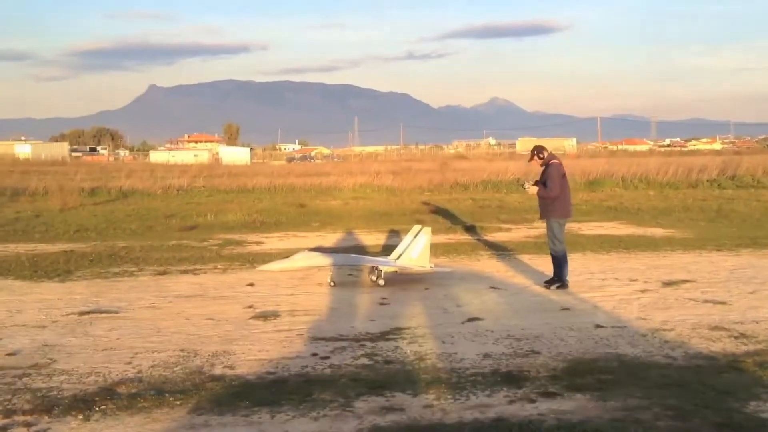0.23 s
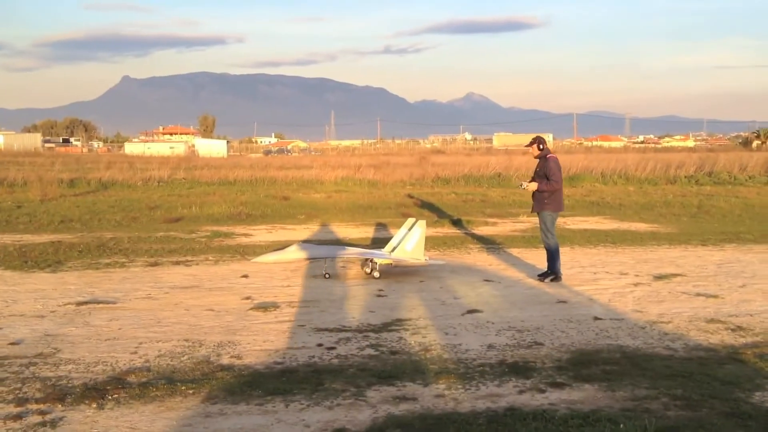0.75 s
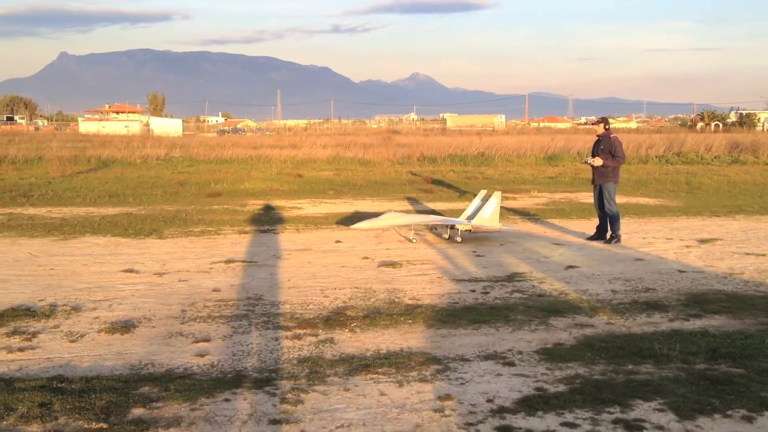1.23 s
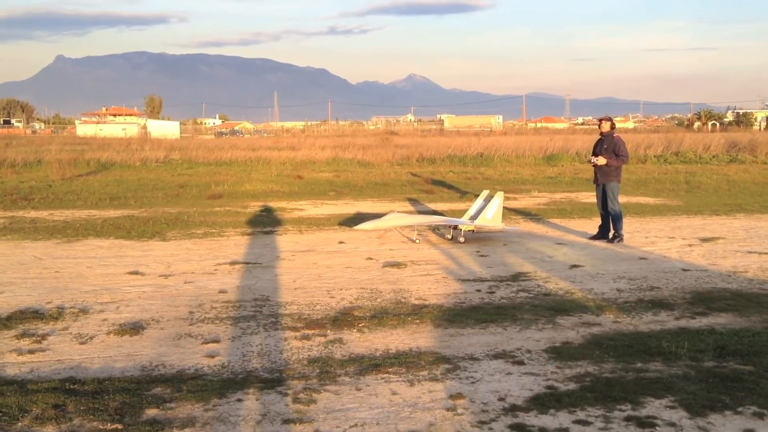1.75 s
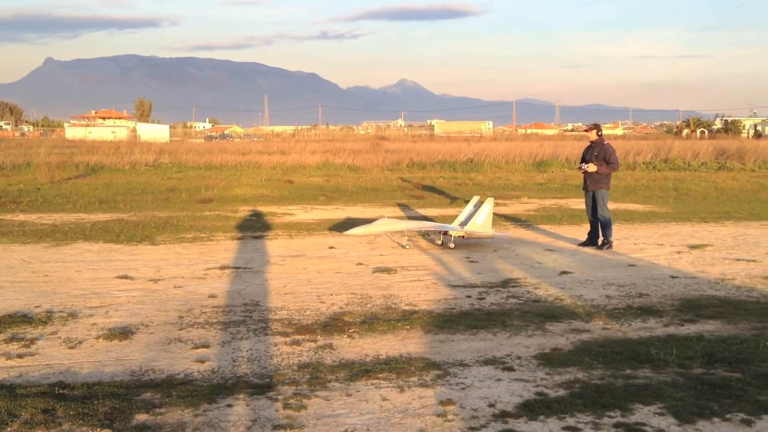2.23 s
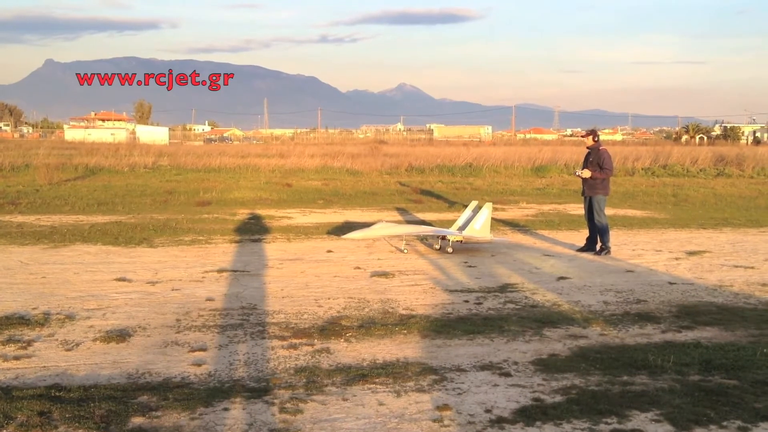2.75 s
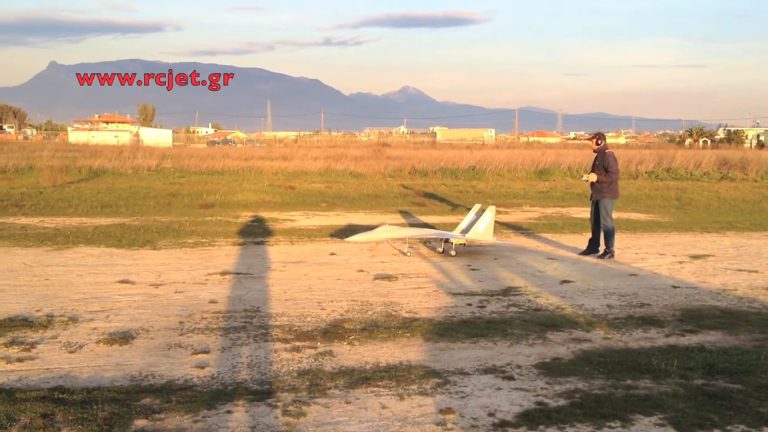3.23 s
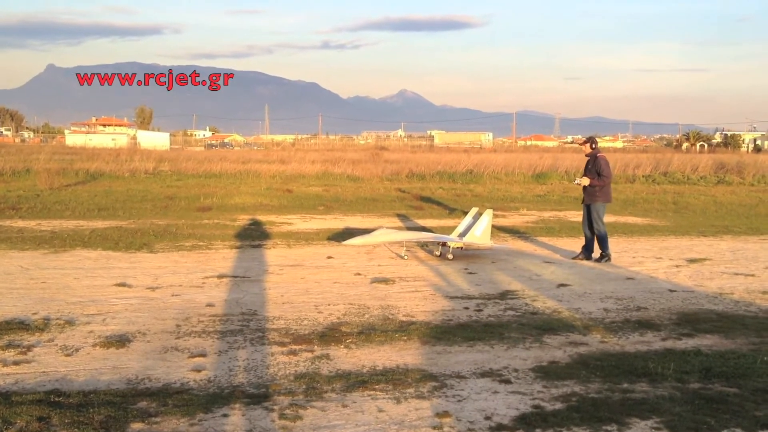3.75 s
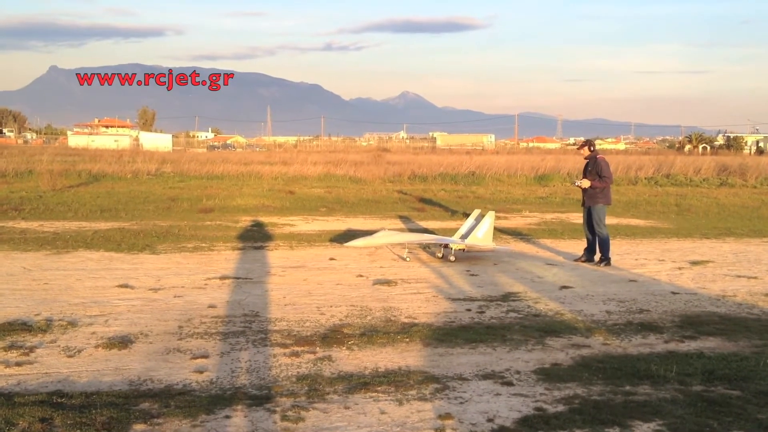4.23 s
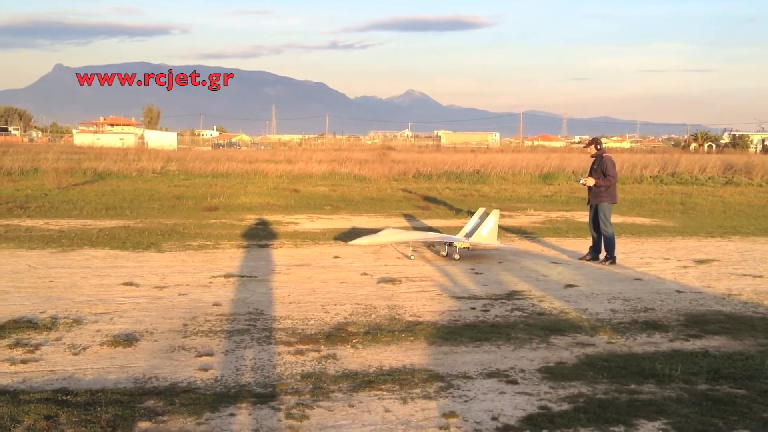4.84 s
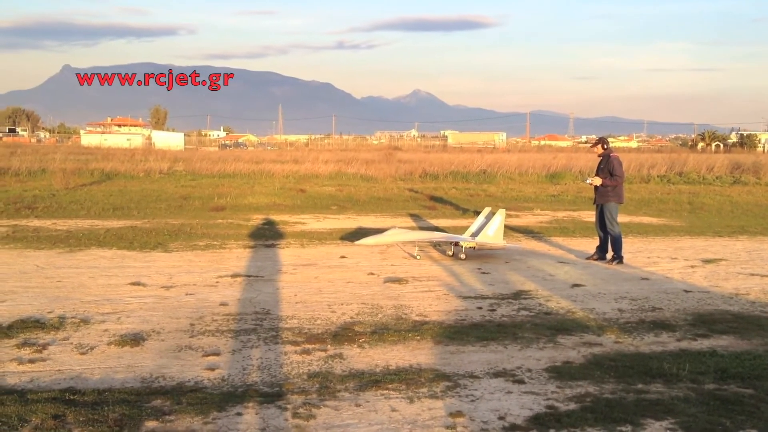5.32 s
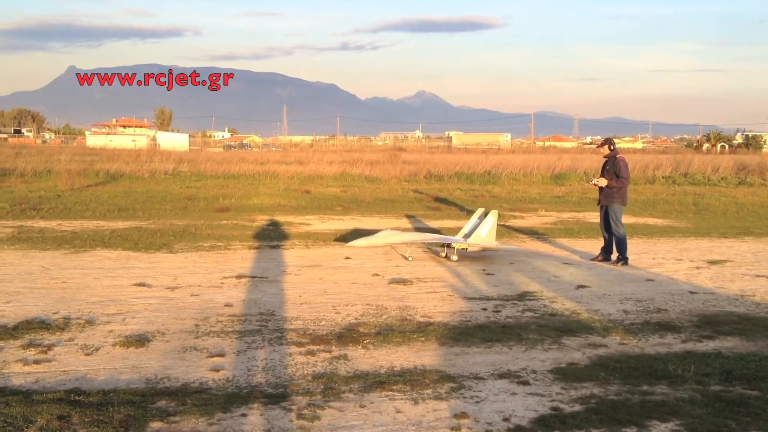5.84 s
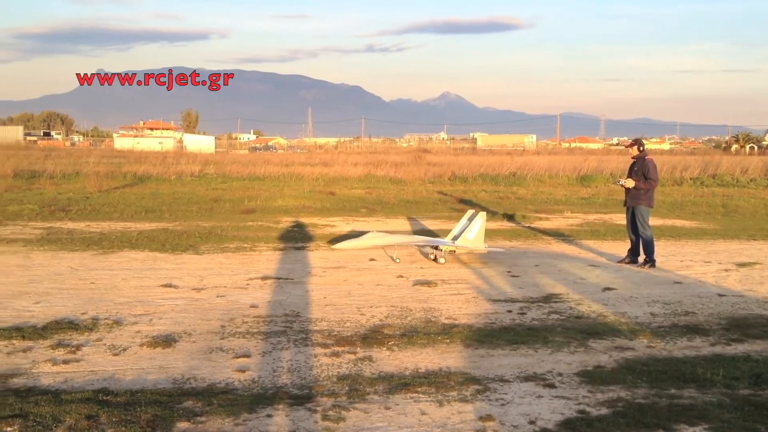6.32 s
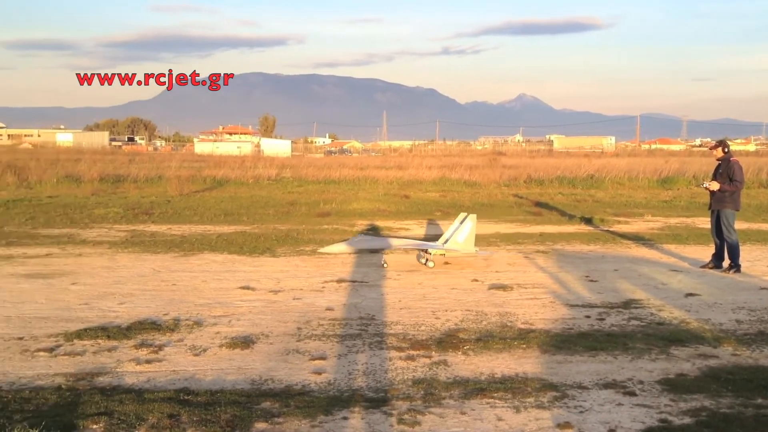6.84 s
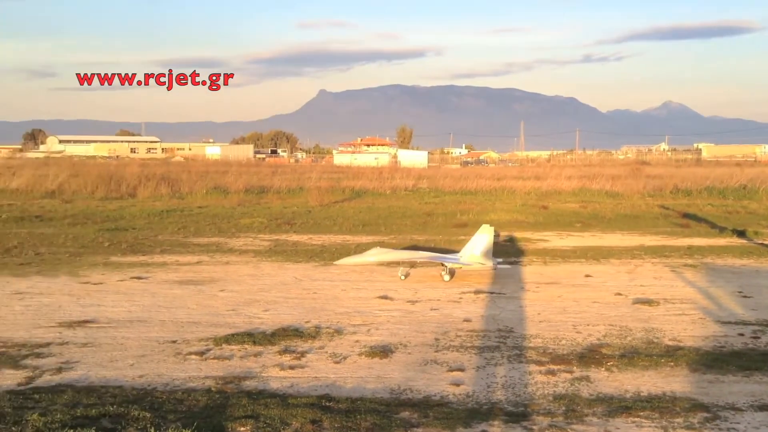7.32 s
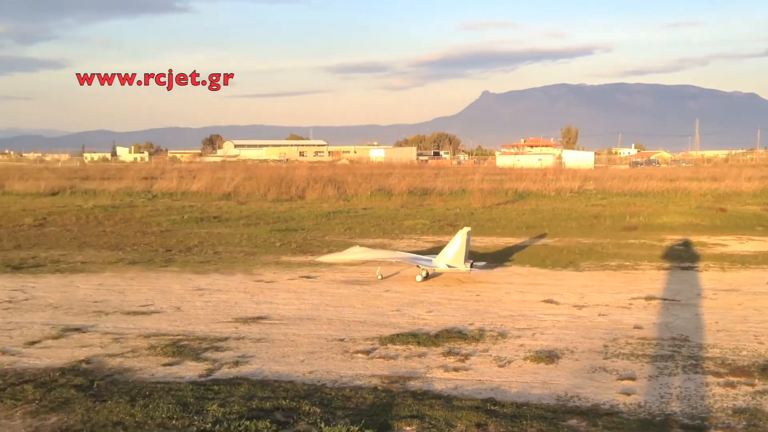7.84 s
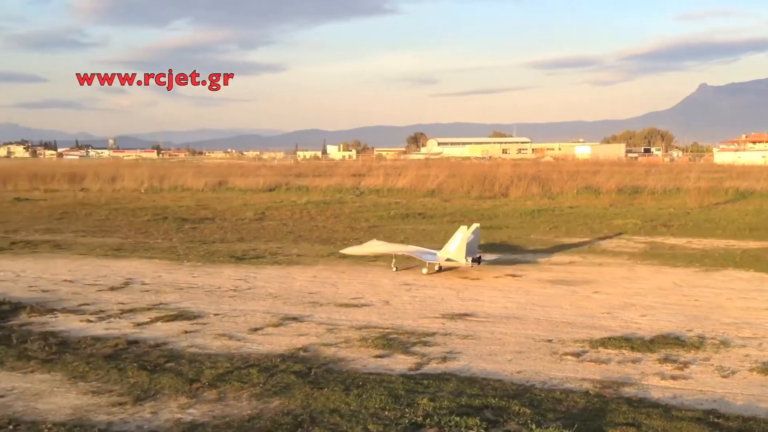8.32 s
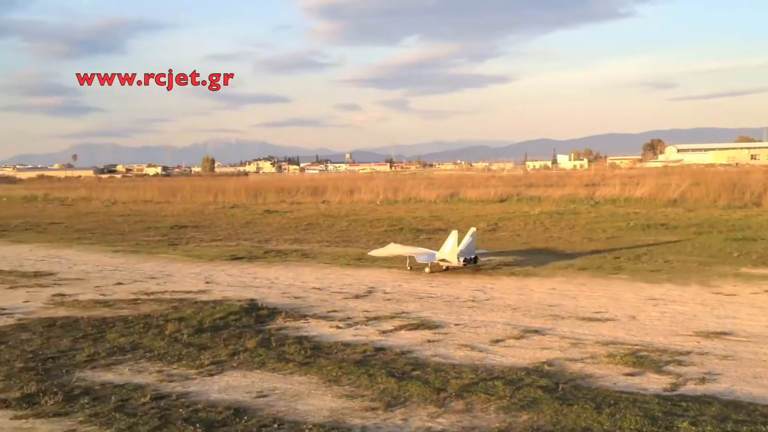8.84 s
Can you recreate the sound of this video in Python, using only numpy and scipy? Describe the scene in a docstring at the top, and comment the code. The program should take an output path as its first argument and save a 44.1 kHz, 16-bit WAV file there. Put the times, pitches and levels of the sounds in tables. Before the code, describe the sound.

A model jet idles on a dirt strip, its two small turbines giving a high, wavering whistle over a soft rush of exhaust. After about a second the whistle jumps abruptly higher. The engines then spool up, the whine climbing as the exhaust swells into a hissing roar. The roar takes on a sweeping tone as the plane turns and rolls away, heard in mono.

```python
"""A dirt strip: a model jet with two small gas turbines idles slowly. After a cut it is at fast idle,
spools up and starts its take-off roll. The exhaust roar swells with thrust; a short echo sweeps down
through it as the plane turns its tail and rolls away. The two compressors whistle almost in unison
and beat against each other. One mono microphone."""
import sys
import numpy as np
from scipy import signal
from scipy.fft import rfft, irfft, next_fast_len
from scipy.io import wavfile
from scipy.ndimage import uniform_filter1d

SR = 44100
rng = np.random.default_rng(int(sys.argv[2]) if len(sys.argv) > 2 else 0)


def wav_record(signal):
    """Record a signal, one row per channel, as 16-bit PCM in the file named by sys.argv[1]."""
    frames = np.transpose(np.atleast_2d(signal))
    bounded = np.clip(frames, -1, 1)
    # unit amplitude maps onto the largest positive 16-bit level
    quanta = np.round(bounded * 32767).astype(np.int16)
    wavfile.write(sys.argv[1], SR, quanta)


N = 399987
FRAME, HOP = 1536, 384
TIME_S, BIN_HZ = np.arange(N) / SR, np.fft.rfftfreq(FRAME, 1 / SR)
CUT_S, CUT_LENGTH_S = .96, .025  # cut from a slow-idle shot to a fast-idle shot

# microphone housing peaks and dips: centre_hz, half_width_hz, gain_db
HOUSING_BANDS = [(449, 71, -6), (1925, 164, 2.5), (3093, 257, -13.5), (3587, 92, -6), (4542, 178, 10.5),
                 (4850, 86, -5.5), (5360, 206, 4), (5840.0, 153, -6.5), (7560.0, 300.0, -1),
                 (8220, 89, -12), (8950, 124, 5.5), (10250, 297, -17), (12870, 220, -4.5)]


def from_db(db):
    """Decibels to gain."""
    return 10 ** (np.asarray(db) / 20)


def unit(x):
    """Scale to rms 1."""
    return x / np.sqrt(np.mean(x ** 2) + 1e-20)


def ramp(t, start_s, end_s):
    """Linear rise from 0 to 1."""
    return np.clip((t - start_s) / (end_s - start_s), 0, 1)


def curves(table, t):
    """Each value column of a time table, interpolated at t."""
    time_s, *columns = np.transpose(table)
    return [np.interp(t, time_s, column) for column in columns]


def bumps_db(rows, axis):
    """Sum of bell-shaped peaks and dips over frequency or time."""
    return sum(db * np.exp(-.5 * ((axis - centre) / width) ** 2) for centre, width, db in rows)


def wander(rate_hz):
    """Random motion of rms 1, mostly slower than rate_hz."""
    size = next_fast_len(N)
    hz = np.fft.rfftfreq(size, 1 / SR)
    spectrum = rfft(rng.standard_normal(size)) / (1 + (hz / rate_hz) ** 2)
    return unit(irfft(spectrum, size)[:N])


def stage_at(t, spool_up_s=(4.05, 5.2), turn_s=(6.2, 8.6)):
    """0 slow idle, 1 fast idle, 2 full thrust from the side, 3 full thrust from behind."""
    return ramp(t, CUT_S, CUT_S + CUT_LENGTH_S) + ramp(t, *spool_up_s) + ramp(t, *turn_s)


def exhaust_colour_db(t):
    """The jet's spectrum follows thrust and direction."""
    # exhaust spectrum per stage: frequency_hz, relative_db
    slow_idle = [(40.0, -45), (80.0, -49), (130.0, -10), (190.0, -2), (330.0, 1.5), (700.0, -4.5),
                 (1100.0, -12.5), (2200.0, -14.5), (4400.0, -17), (7200.0, -16.5), (9500.0, -19),
                 (11500.0, -11), (13000.0, -23), (15200.0, -25)]
    fast_idle = [(40.0, -49.3), (80.0, -54), (130.0, -14), (190.0, -6), (330.0, 0.2), (700.0, -3),
                 (1100.0, -10), (2200.0, -14), (4400.0, -18), (7200.0, -9.5), (9500.0, -17), (11500.0, -9),
                 (13000.0, -57), (15200.0, -62)]
    thrust_side = [(40.0, -51), (80.0, -59), (130.0, -14), (190.0, -4), (330.0, -2), (700.0, -1.5),
                   (1100.0, -9), (2200.0, -10.5), (4400.0, -17), (7200.0, -9.5), (9500.0, -15),
                   (11500.0, -6), (13000.0, -15.5), (15200.0, -19)]
    thrust_rear = [(40.0, -52.0), (80.0, -40), (130.0, -22), (190.0, -3.5), (330.0, -2), (700.0, 0.5),
                   (1100.0, -4), (2200.0, -3), (4400.0, -8), (7200.0, -0.5), (9500.0, -6), (11500.0, -1.5),
                   (13000.0, -8.5), (15200.0, -20)]
    # directional peaks and dips: stage, centre_hz, half_width_hz, gain_db
    direction_bands = [(0, 365, 30, 5.5), (0, 790, 40, -3), (0, 1080, 60, 6), (0, 1700, 50, 2),
                       (0, 1900, 90, -8.5), (0, 2650, 70, -8), (0, 3570, 200, -5), (0, 4500, 100, 0.5),
                       (0, 6180, 130, -9), (1, 280, 30, -4), (1, 842, 45.3, -9.5), (1, 1620, 70, -3),
                       (1, 2300, 80, -1.5), (1, 2540, 130, 2.5), (1, 3400, 110, 5), (1, 5320, 160, 8.5),
                       (1, 5820, 120, 10), (2, 840, 50, -3.5), (2, 1320, 90, 3.5), (2, 1650, 70, -3),
                       (2, 2930, 70, -4.5), (2, 3250, 150, 4), (3, 268, 50, 1.5), (3, 1830, 150, 2),
                       (3, 2900, 150, 1), (3, 816, 50, 4.2), (3, 3900, 120, 4), (3, 5080, 180, 3.5),
                       (3, 5840, 70, -11), (3, 6600, 250, -5.5), (3, 7700, 350, 3), (3, 8880, 70, -19)]
    stage = stage_at(t)
    colour_db = 0
    for k, points in enumerate([slow_idle, fast_idle, thrust_side, thrust_rear]):
        hz, db = np.transpose(points)
        stage_db = np.interp(np.log(BIN_HZ + 1), np.log(hz), db)
        stage_db += bumps_db([row[1:] for row in direction_bands if round(row[0]) == k], BIN_HZ)
        weight = np.maximum(1 - abs(stage - k), 0)
        colour_db = colour_db + weight[:, None] * stage_db
    return colour_db


def tailpipe_howl_db(t, centre_hz=700, half_width_hz=72):
    """Hollow tailpipe resonance, strongest while the shafts accelerate."""
    # resonance height: time_s, gain_db
    heights = [(0, 4), (4, 5), (4.7, 7), (5.8, 5), (7.2, -.5), (9.07, 1.5)]
    height_db, = curves(heights, t)
    return bumps_db([(centre_hz, half_width_hz, height_db[:, None])], BIN_HZ)


def echo_comb(t, roll_s=6.06, rise_s=2.5, standing_ms=.86, ms_per_s=.624, fade_hz=2600):
    """Gain from a short inverted echo, weaker in the treble; delay and strength grow in the roll."""
    delay_ms = standing_ms + ms_per_s * np.maximum(t - roll_s, 0)
    strength = .16 + .25 * ramp(t, roll_s, roll_s + rise_s)
    echo = strength[:, None] / (1 + (BIN_HZ / fade_hz) ** 4)
    return abs(1 - echo * np.exp(-2j * np.pi * BIN_HZ * delay_ms[:, None] / 1000))


def band_db(field, low_hz, high_hz):
    """Level of one band in each frame."""
    band = (BIN_HZ > low_hz) & (BIN_HZ < high_hz)
    return 10 * np.log10((field[:, band] ** 2).sum(1) / len(BIN_HZ))


def exhaust(idle_roar_db=-49.5, idle_hiss_db=-50.5, crossover_hz=2400, patch_db=1.0, flicker_db=.32):
    """Turbulent jet noise: the plume roars, the nozzles hiss."""
    # exhaust levels from fast idle on: time_s, roar_db, hiss_db
    levels = [(1, -53, -53.5), (2.6, -51, -52), (4.05, -51.5, -51.8), (4.4, -46, -49), (5.1, -41.5, -45),
              (5.9, -39, -41), (7.2, -40.5, -41.5), (7.7, -37, -41.5), (8.7, -41.5, -37),
              (9.07, -40.5, -38)]
    t = np.arange(0, N + FRAME, HOP) / SR
    field = from_db(exhaust_colour_db(t) + tailpipe_howl_db(t) + bumps_db(HOUSING_BANDS, BIN_HZ))
    field *= echo_comb(t)
    roar_db, hiss_db = np.where(t < CUT_S, [[idle_roar_db], [idle_hiss_db]], curves(levels, t))
    roar_gain_db = roar_db - band_db(field, 150, 2500)
    hiss_gain_db = hiss_db - band_db(field, 3800, 7900)
    treble = BIN_HZ ** 2 / (BIN_HZ ** 2 + crossover_hz ** 2)
    gain_db = roar_gain_db[:, None] * (1 - treble) + hiss_gain_db[:, None] * treble
    # eddies: brief spectral patches and a slight overall flicker
    patches = uniform_filter1d(rng.standard_normal(field.shape), size=14, axis=0)
    patches = unit(uniform_filter1d(patches, size=8, axis=1))
    flicker = unit(uniform_filter1d(rng.standard_normal(len(t)), size=4))
    field *= from_db(gain_db + patch_db * patches + flicker_db * flicker[:, None])
    framing = dict(nperseg=FRAME, noverlap=FRAME - HOP)
    noise = signal.stft(rng.standard_normal(N + 2 * FRAME), **framing)[2][:, :len(t)]
    return signal.istft(noise * field.T, **framing)[1][:N]


def shafts(idle_hz=733.3, idle_gap_hz=7.589, in_step_s=.8065, inertia_s=.2):
    """Mean speed and gap of the two shafts; they fall into step at slow idle, then the governors hunt."""
    # mean shaft speed from fast idle on: time_s, speed_hz
    speeds = [(.85, 936), (2.2, 960.8), (2.85, 962.2), (3.5, 978), (4.16, 989.5), (4.52, 1037),
              (4.95, 1165), (5.3, 1303), (6.42, 1850), (6.8, 1904), (7.72, 1910), (8.3, 2050), (9.07, 2000)]
    # first shaft minus second, leading in the spool-up: time_s, gap_hz
    gaps = [(.96, 3.846), (1.444, 1.969), (1.885, 3.125), (2.282, 8.682), (2.555, 9.567), (2.935, .744),
            (3.148, -.03), (3.399, -4.837), (3.795, -6.23), (4.168, .285), (4.42, .02), (4.6, 2.2),
            (5.8, 10), (6.35, 44), (6.72, 4), (9.07, 7)]
    speed_hz = uniform_filter1d(curves(speeds, TIME_S)[0], size=round(inertia_s * SR))  # rotor inertia
    gap_hz, = curves(gaps, TIME_S)
    closing_gap_hz = idle_gap_hz * (1 - ramp(TIME_S, 0, in_step_s))
    slow_idle = TIME_S < CUT_S
    return np.where(slow_idle, idle_hz, speed_hz), np.where(slow_idle, closing_gap_hz, gap_hz)


def tone_gains(speed_hz, stage):
    """Gain per shaft order; the tones glide through the housing's peaks and dips."""
    orders = (1, 6, 12, 18)  # unbalance, main blades, all blades, overtone
    # base level, one row per order: slow_idle_db, fast_idle_db, thrust_side_db, thrust_rear_db
    tone_levels = [(-78, -75, -57.5, -58.5), (-63.5, -71, -53.5, -65.5), (-40, -30, -42, -60),
                   (-59, -81, -71.5, -70)]
    # main-blade whine flares as the plane moves: centre_s, half_length_s, gain_db
    flares = [(5.1, .14, 8.5), (6.3, .13, 15), (7.1, 0.44, 13), (8, .15, 19.5)]
    housing_db = bumps_db(HOUSING_BANDS, BIN_HZ)
    gains = {}
    for order, stage_db in zip(orders, tone_levels):
        pitch_hz = order * speed_hz
        level_db = np.interp(stage, range(4), stage_db) + np.interp(pitch_hz, BIN_HZ, housing_db)
        if order == 6:
            level_db += bumps_db(flares, TIME_S)
        gain = from_db(level_db) * (pitch_hz < SR / 2)
        gains[order] = uniform_filter1d(gain, size=round(CUT_LENGTH_S * SR))
    return gains


def compressors(flutter=.14, thrust_flutter=.17, jitter_rad=.034, thrust_jitter_rad=.44):
    """Each shaft whistles at multiples of its speed; intake turbulence shakes it more as thrust builds."""
    speed_hz, gap_hz = shafts()
    stage = stage_at(TIME_S)
    thrust = np.clip(stage - 1, 0, 1)
    gains = tone_gains(speed_hz, stage)
    second_gain = from_db(np.interp(stage, range(4), (-2.5, -2.5, -18, -5)))  # relative to engine one
    depth = flutter + thrust_flutter * thrust
    whistle = np.zeros(N)
    for side, share in ((1, 1), (-1, second_gain)):
        angle_rad = 2 * np.pi * np.cumsum(speed_hz + side * gap_hz / 2) / SR
        shake_rad = jitter_rad * wander(90) + thrust_jitter_rad * thrust * wander(45)
        tones = sum(gain * np.cos(order * angle_rad + shake_rad) for order, gain in gains.items())
        whistle += share * tones * np.exp(depth * wander(22) - depth ** 2)
    whistle *= np.minimum(2 * abs(TIME_S - CUT_S) / CUT_LENGTH_S, 1)  # whistle dips briefly at the cut
    return whistle * np.sqrt(2 / (1 + second_gain ** 2))


def scene():
    """Whistle and roar, the same in both channels."""
    jet = compressors() + exhaust()
    return np.array([jet, jet])


def record(dry):
    """Steep low-pass."""
    cutoff_hz = 15330
    taps = signal.firwin(1023, cutoff_hz, window=("kaiser", 9), fs=SR)
    return signal.oaconvolve(dry, taps[None], "same")


dry = scene()
out = record(dry)
wav_record(out)
```